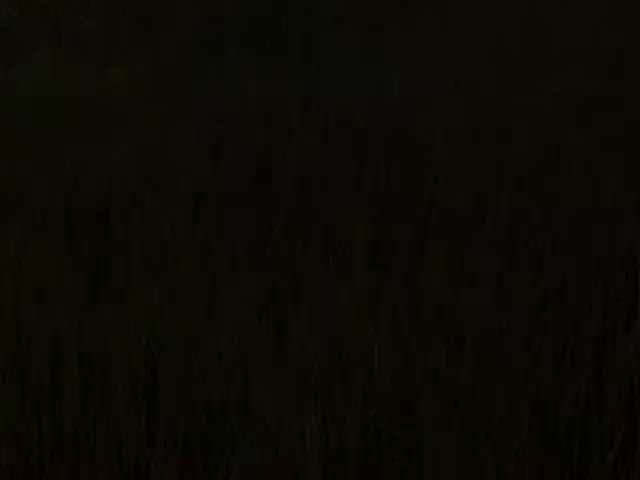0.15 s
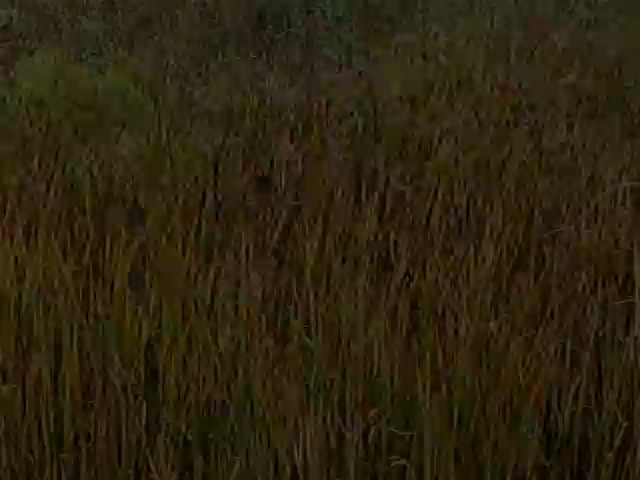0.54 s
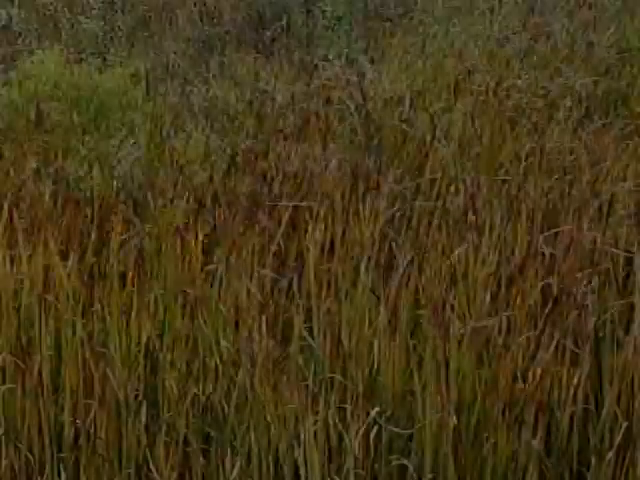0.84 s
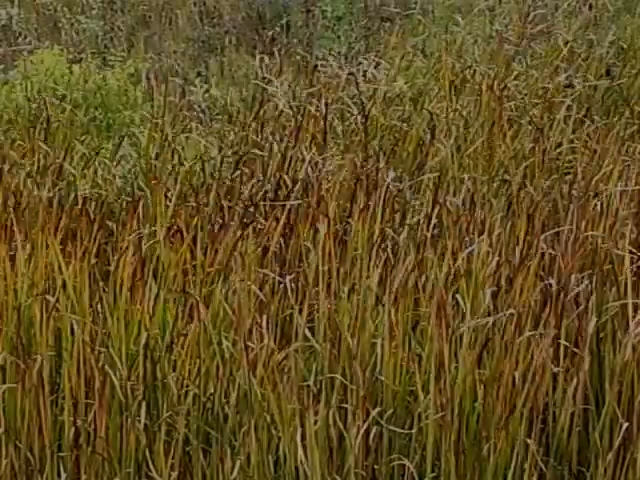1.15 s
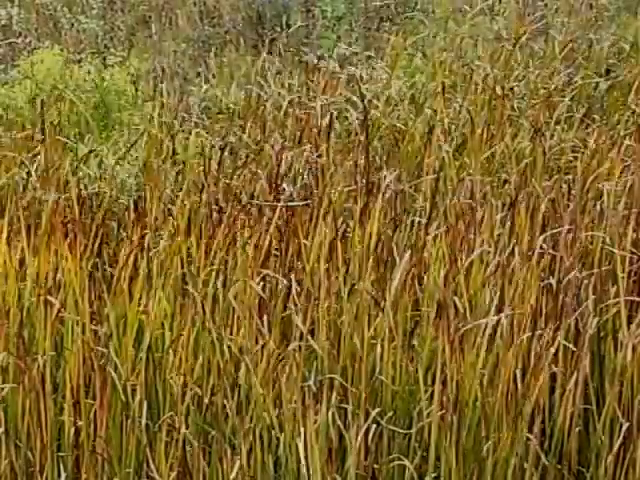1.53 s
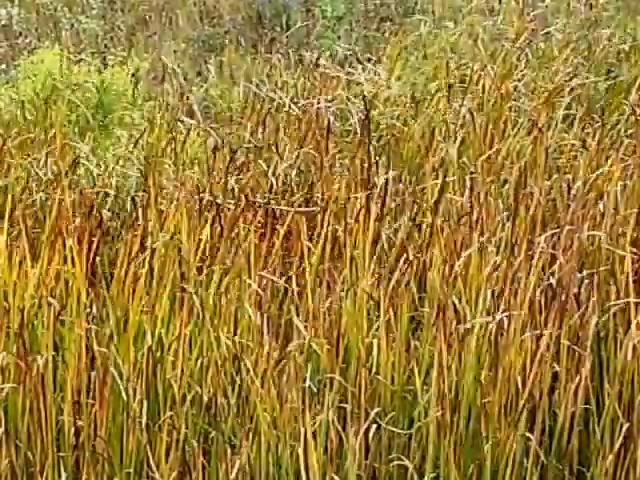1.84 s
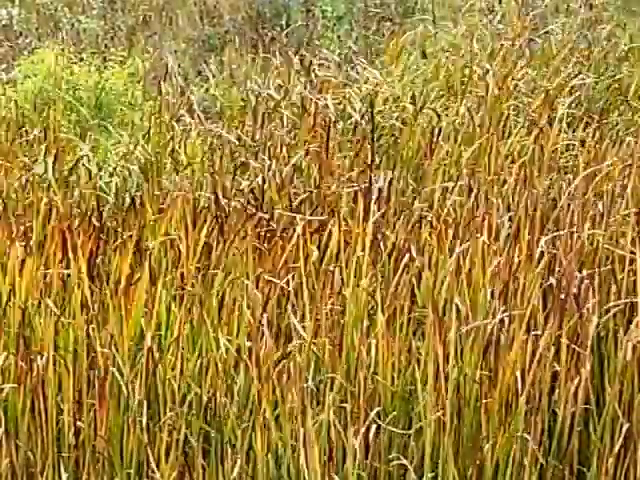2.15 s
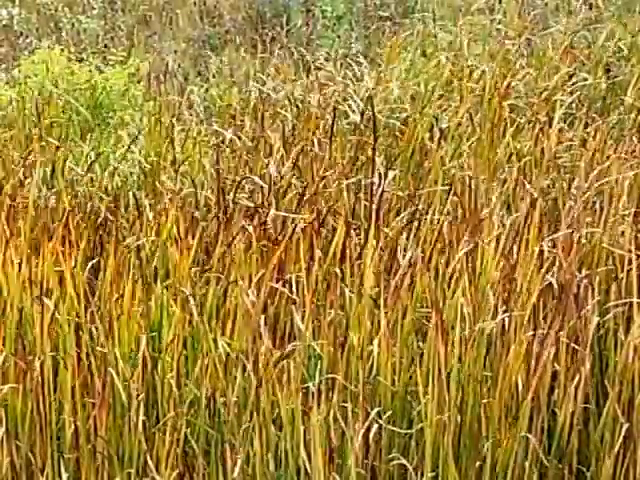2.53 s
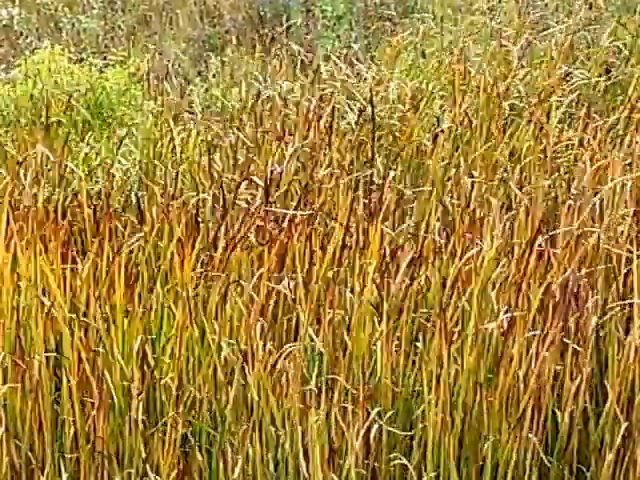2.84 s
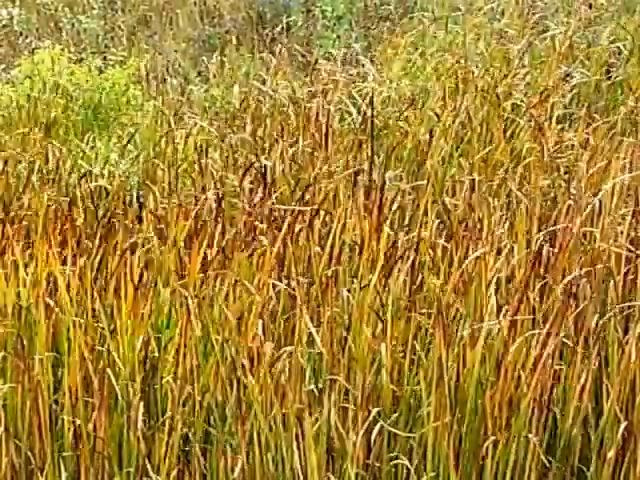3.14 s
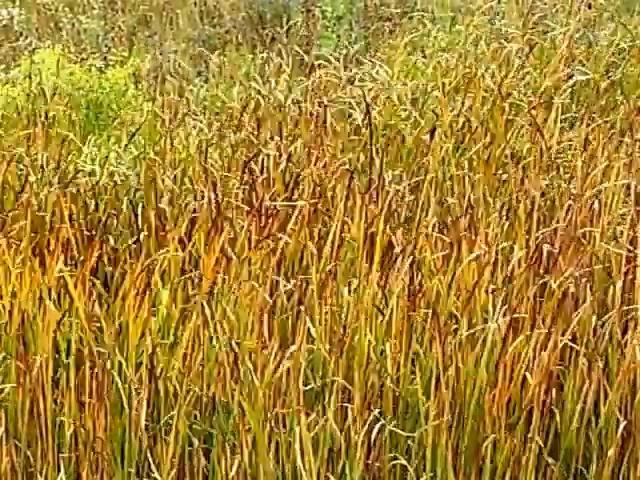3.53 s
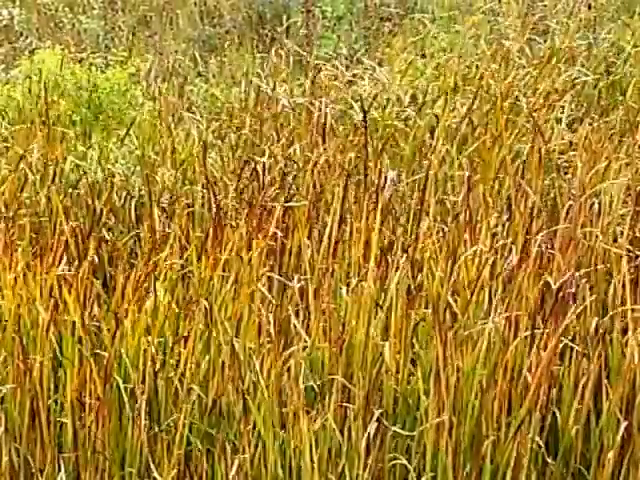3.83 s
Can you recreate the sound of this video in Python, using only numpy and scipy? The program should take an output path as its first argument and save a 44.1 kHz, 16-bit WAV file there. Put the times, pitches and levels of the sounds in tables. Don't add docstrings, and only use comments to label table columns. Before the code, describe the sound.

Distant traffic roar across a field of tall grass, fading in from silence with wind bumps

```python
import sys
import numpy as np
from scipy import signal
from scipy.fft import rfft, irfft
from scipy.io import wavfile
from scipy.ndimage import uniform_filter1d

SR = 44100
rng = np.random.default_rng(int(sys.argv[2]) if len(sys.argv) > 2 else 0)


def boost_factor(decibels):
    exponent = np.asarray(decibels, float) / 20
    return 10 ** exponent


def file_out(sig):
    cols = np.atleast_2d(sig).T
    lim = np.clip(cols, -1, 1)
    pcm = np.round(lim * 32767).astype(np.int16)
    wavfile.write(sys.argv[1], SR, pcm)


N = 176400
T = np.arange(N) / SR
F = np.maximum(np.arange(N // 2 + 1) * SR / N, 1)


def unit(x):
    return x / np.sqrt(np.mean(x ** 2))


def curve(table, column):
    rows = np.array(table)
    return np.interp(T, rows[:, 0], rows[:, column])


def walk(rate_hz):
    hold = int(SR / rate_hz)
    levels = np.repeat(rng.standard_normal(N // hold + 1), hold)
    smooth = uniform_filter1d(uniform_filter1d(levels, hold), hold)
    return unit(smooth[:N])


def gate(start_s, length_s, edge_s):
    return np.clip(np.minimum(T - start_s, start_s + length_s - T) / edge_s, 0, 1)


def resonance(hz, width_hz):
    noise = rfft(rng.standard_normal(N))
    return unit(irfft(noise / (1 + (2 * (F - hz) / width_hz) ** 2), N))


def bands(colour, flicker_db, shared_db, rate_hz, tilt_db, pivot_hz):
    hz, db = np.array(colour).T
    octave = np.log2(F)
    low, high = np.log2(hz[0]), np.log2(hz[-1])
    full = rfft(rng.standard_normal(N)) * boost_factor(np.interp(octave, np.log2(hz), db))
    out = 0
    near = walk(rate_hz / 4)
    for centre in np.arange(12, 38) / 3:
        if low <= centre <= high + .5:
            near = .8 * near + .6 * walk(rate_hz / 4)
            part = irfft(full * np.clip(1 - 3 * abs(octave - centre), 0, 1), N)
            waver_db = flicker_db * walk(rate_hz) + shared_db * near
            out = out + part * boost_factor(waver_db + tilt_db * (centre - np.log2(pivot_hz)))
    return unit(out)


# pitch_hz, level_db
FAR_HORN = (564.5, -41)


def horn():
    hz, db = FAR_HORN
    tone = np.sqrt(2) * np.sin(2 * np.pi * hz * T + .5 * walk(13))
    level = boost_factor(db + 1.5 * walk(25))
    return tone * level * gate(start_s=2.97, length_s=.21, edge_s=.03)


# time_s, level_db, tilt_db_per_octave (around 100 Hz)
RUMBLE_LEVEL = [(0, -39.5, -2), (.3, -35, -2), (.5, -34, -3), (.7, -33.5, -3), (1, -34.5, -1),
                (1.3, -34, 0), (1.5, -34, 0), (1.65, -34.5, 0), (2, -35, 0), (2.4, -37, 1),
                (2.55, -31.5, -.6), (2.85, -32, 0), (3.1, -33, -.6), (3.4, -35.5, 0), (3.55, -35.5, 1),
                (3.8, -35, 0), (4, -36, 0)]
# frequency_hz, density_db (per Hz)
RUMBLE_SPECTRUM = [(11, -39), (18, -11), (61, -1.5), (135, -6.5), (163, -11.5), (198, -8.5), (327, -14),
                   (420, -16.5), (550, -48), (920, -120)]


def rumble():
    low = bands(RUMBLE_SPECTRUM, flicker_db=1.0, shared_db=1.0, rate_hz=12,
                tilt_db=curve(RUMBLE_LEVEL, 2), pivot_hz=100)
    return low * boost_factor(curve(RUMBLE_LEVEL, 1))


# time_s, firing_hz, level_db
ENGINE_NOTE = [(1, 58, -37.5), (1.27, 58.1, -43), (1.4, 60.95, -32.5), (1.52, 59.9, -31.5),
               (1.6, 60.22, -43), (1.9, 63.04, -36.5), (2.2, 62.96, -38.5), (2.46, 61.76, -42),
               (2.55, 59.93, -34), (2.8, 54, -33.5), (2.92, 55.9, -36), (3.1, 56.95, -32),
               (3.35, 52.95, -40), (3.42, 55.05, -44), (3.75, 62.9, -37), (4, 63.1, -44)]


def engine():
    firing_hz = curve(ENGINE_NOTE, 1) * (1 + .07 * walk(16))
    phase = 2 * np.pi * np.cumsum(firing_hz) / SR
    level = boost_factor(curve(ENGINE_NOTE, 2) - 2.0 + 2.5 * walk(12))
    return np.sqrt(2) * np.sin(phase) * level * gate(start_s=0.85, length_s=4, edge_s=.1)


def eddy(out, at_s, size, hz):
    u = np.arange(-1200, 1200) * np.pi * hz / SR
    dent = size * (1 - 2 * u * u) * np.exp(-u * u)
    return out + np.pad(dent, (int(at_s * SR) - 1200, N))[:N]


# start_s, length_s, level_db
GUST_TIMES = [
    (.36, .1, -33),
    (0.739, .2, -35),
]
# time_s, signed_size, pitch_hz
STRONG_EDDIES = [(.405, -0.13, 110), (.4447, -0.16, 70), (0.455, 0.066, 60.4), (0.726, -0.097, 110),
                 (.764, -0.14, 110), (.776, -0.18, 280), (.786, -0.17, 220), (.814, -0.19, 200),
                 (.824, 0.15, 70.3), (.843, -.08, 120), (.855, -0.084, 249), (.864, -.1, 150),
                 (.872, 0.086, 70), (.888, -0.054, 120), (0.9041, 0.17, 80), (.912, -0.14, 89),
                 (.943, -0.074, 110), (.8, .07, 200), (3.9996, .07, 300)]


def gusts():
    eddies_per_s, middle_hz, edge_s = 150, 130, .02
    out = np.zeros(N)
    for start, length, db in GUST_TIMES:
        count = int(eddies_per_s * length)
        for place, weakness, kind in rng.random((40, 3))[:count]:
            onset = min(1, place * length / edge_s)
            size = boost_factor(db + 9 - 11 * weakness) * np.sign(kind - .65) * onset
            hz = middle_hz * 2 ** (0.85 * np.sin(40 * kind))
            out = eddy(out, start + place * length, size, hz)
    for at, size, hz in STRONG_EDDIES:
        out = eddy(out, at, size, hz)
    return out


# time_s, level_db, high_band_share (0-1)
CAR_PASS = [
    (0, -38, 0.91),
    (1.2, -33.5, 1),
    (1.7, -38, 0.74),
    (2.2, -39.5, 0.6),
    (2.6, -41, 0.15),
    (3.1, -43.5, 0.16),
    (3.45, -41.5, 0),
    (3.85, -36.5, 0.35),
    (4, -38.5, 0.2),
]


def car():
    share = np.clip(curve(CAR_PASS, 2), 0, 1)
    high = np.sqrt(share) * resonance(1277, width_hz=500)
    low = np.sqrt(1 - share) * resonance(894, width_hz=.6 * 500)
    return (high + low) * boost_factor(curve(CAR_PASS, 1) + 0.39 * walk(5.5))


# time_s, level_db, tilt_db_per_octave (around 1 kHz)
ROAR_LEVEL = [(0, -37, 0.5), (.8, -31.5, 0), (1.3, -33, 0.5), (1.9, -32, 0), (2.3, -32, 1),
              (2.7, -33, -0.2), (3.1, -32.5, 0), (3.5, -32.5, 0.2), (3.85, -31, 0.1), (4, -34, 1.5)]
# frequency_hz, density_db (per Hz)
ROAR_SPECTRUM = [(210, -35.5), (350, -11), (457, -7), (553, -3), (756, -5), (941, 0), (1960, -11),
                 (3400, -24), (4420, -54), (7480, -120)][:-2] + [(5000, -37)]
# pitch_hz, width_hz, level_db
TREAD_WHINE = [(918, 100, -49)]


def roar():
    wash = bands(ROAR_SPECTRUM, flicker_db=0.29, shared_db=0.45, rate_hz=10,
                 tilt_db=curve(ROAR_LEVEL, 2), pivot_hz=1000)
    out = wash * boost_factor(curve(ROAR_LEVEL, 1))
    for hz, width, db in TREAD_WHINE:
        out = out + boost_factor(db + 0.83 * walk(3)) * resonance(hz, width)
    return out


def scene():
    return (horn() + rumble() + engine() + gusts() + car() + roar())[None]


def rolloff(hz, width_hz, db):
    return boost_factor(-np.logaddexp(0, (F - hz) / width_hz) * db)


def camera(dry):
    rate_hz, shelf_hz, top_hz = 8000, 3720, 4800
    taken = rfft(dry) * rolloff(shelf_hz, 110, db=2.5)
    mirror = np.clip(rate_hz * N // SR - np.arange(len(F)), 0, None)
    sampled = taken + np.conj(taken[:, mirror]) * (mirror > 0)
    smoothing = rolloff(shelf_hz - 100, 150, db=2.5) * rolloff(top_hz - 150, 110, db=5.0)
    return irfft(sampled * smoothing * (F < 5600), N)


def low_pass(x):
    return signal.sosfilt(signal.butter(12, 15800, fs=SR, output="sos"), x)


def record(dry):
    start_s, step_s, steps = .0613, .076667, 26
    step = np.clip(np.floor((T - start_s) / step_s), 0, steps)
    fade = (1 - (1 - step / steps) ** 2.24) ** 2.02
    after = T - (start_s + steps * step_s)
    click = 0.055 * (after >= 0) * np.exp(-abs(after) / .00007)
    hiss = boost_factor(-95.5) * rng.standard_normal(dry.shape) * (step > 0)
    return low_pass(camera(dry) * fade + click + hiss)


dry = scene()
out = record(dry)
file_out(out)
```